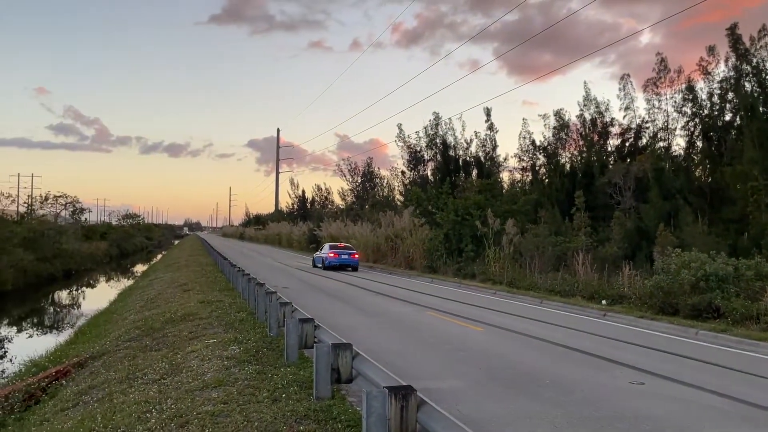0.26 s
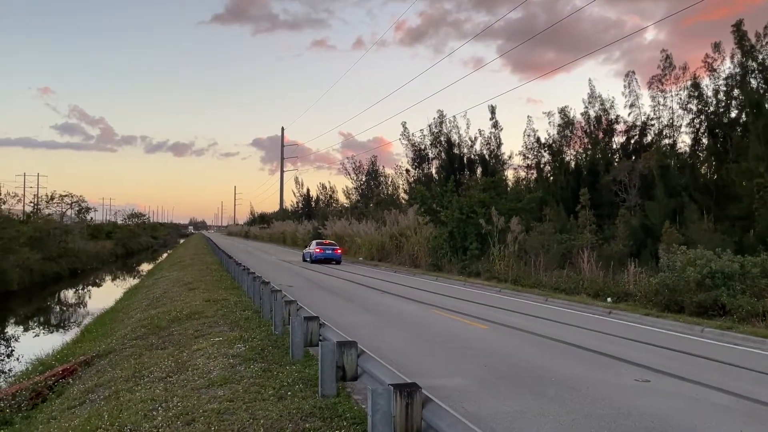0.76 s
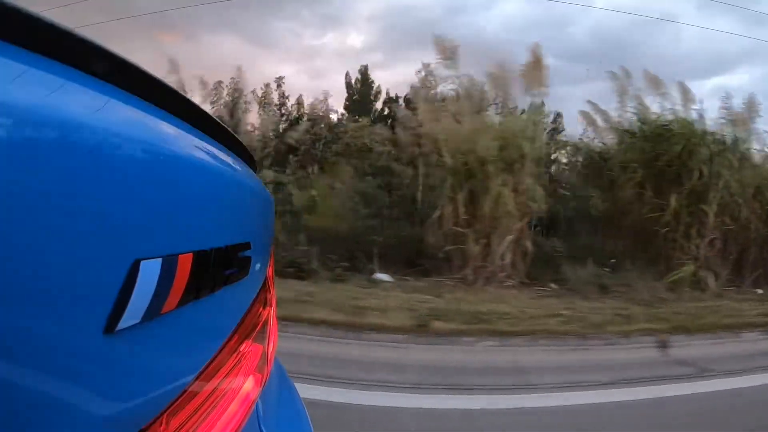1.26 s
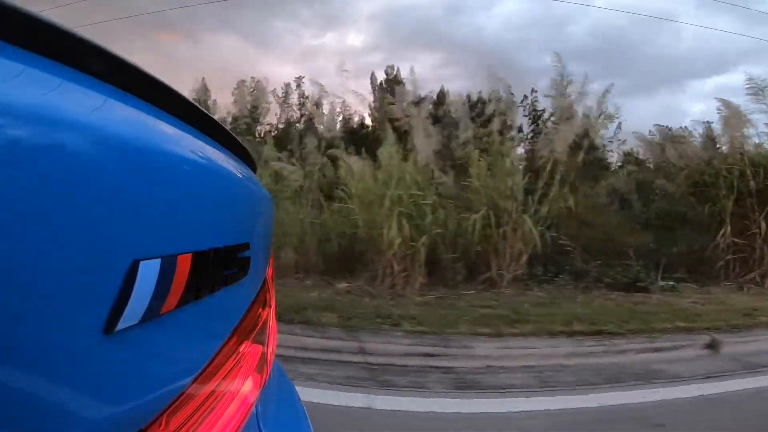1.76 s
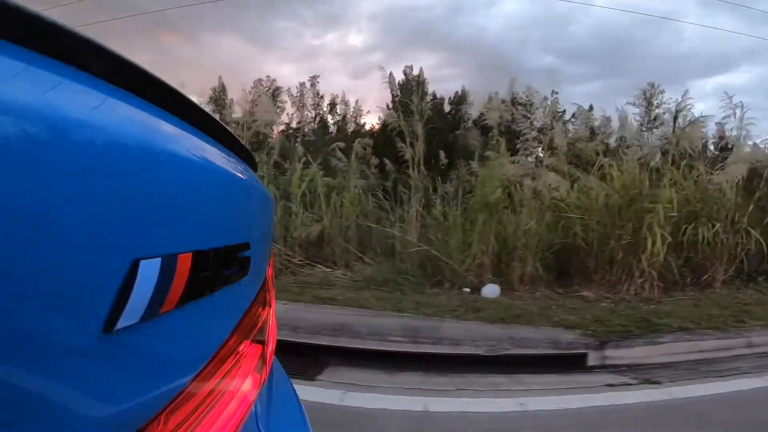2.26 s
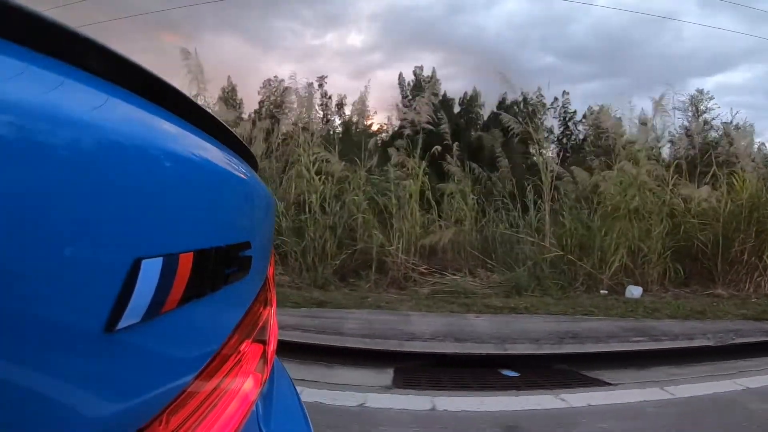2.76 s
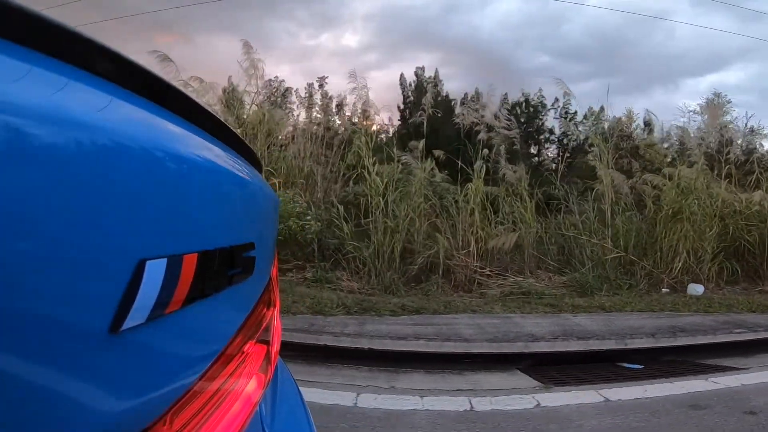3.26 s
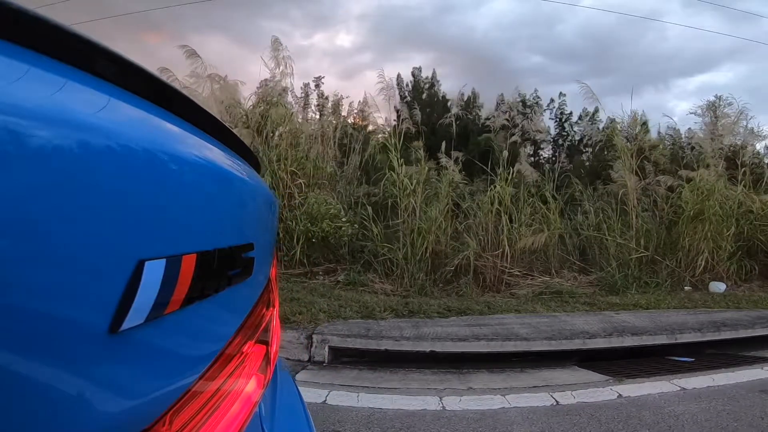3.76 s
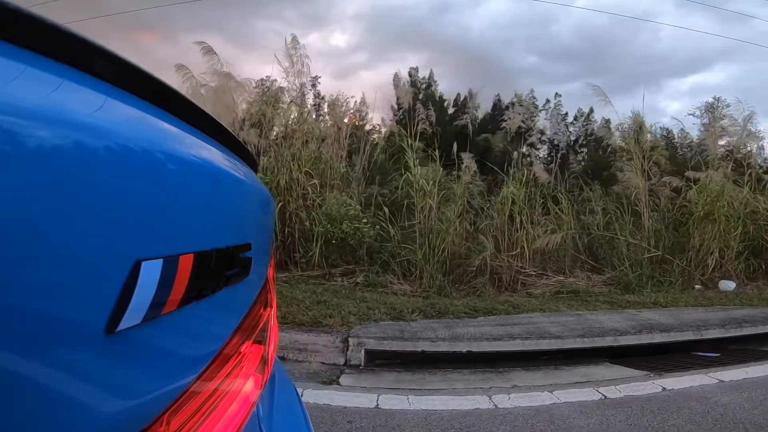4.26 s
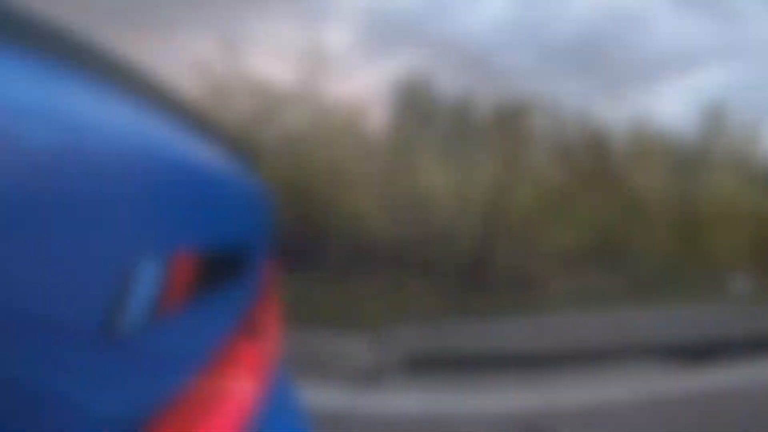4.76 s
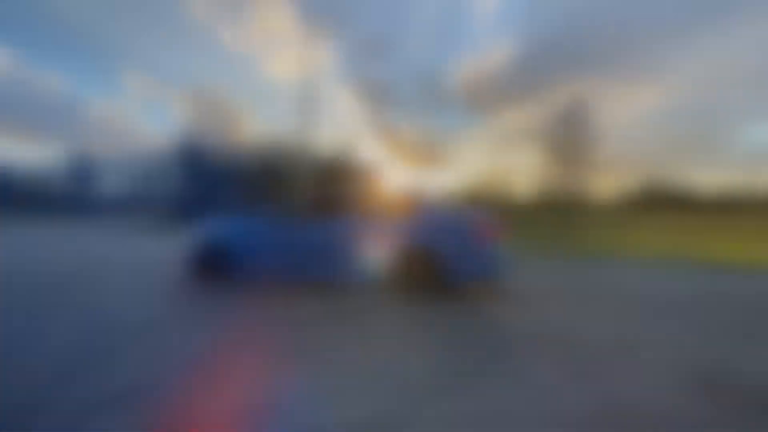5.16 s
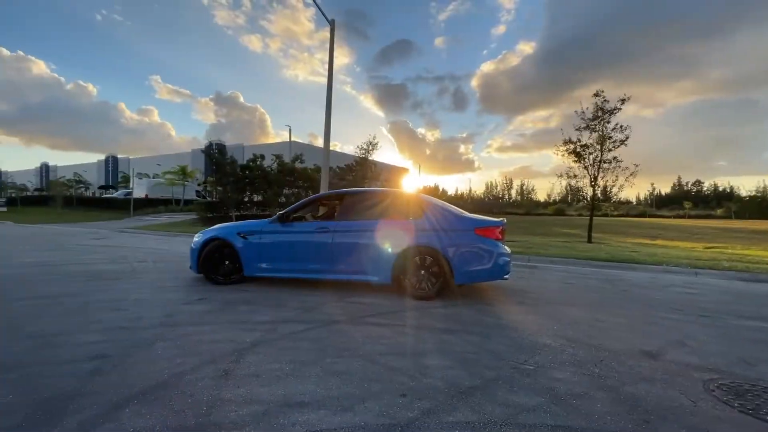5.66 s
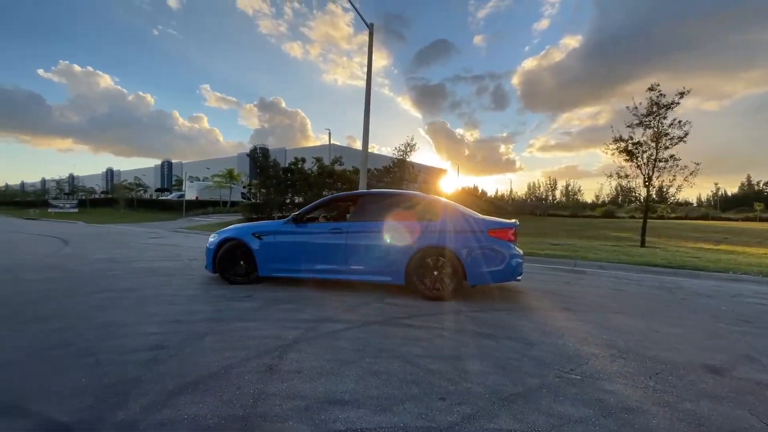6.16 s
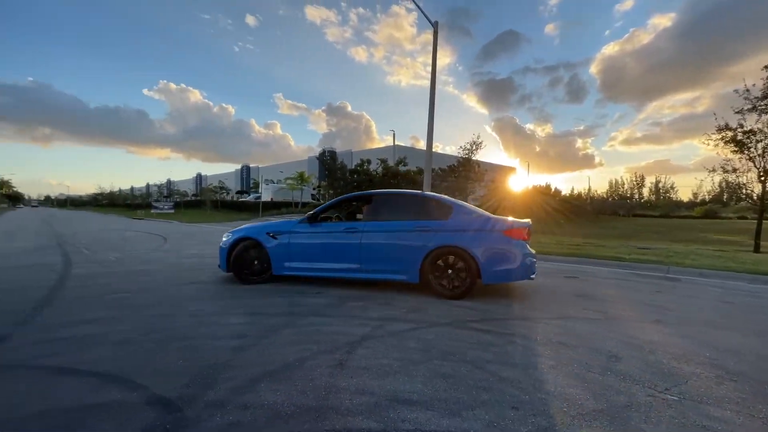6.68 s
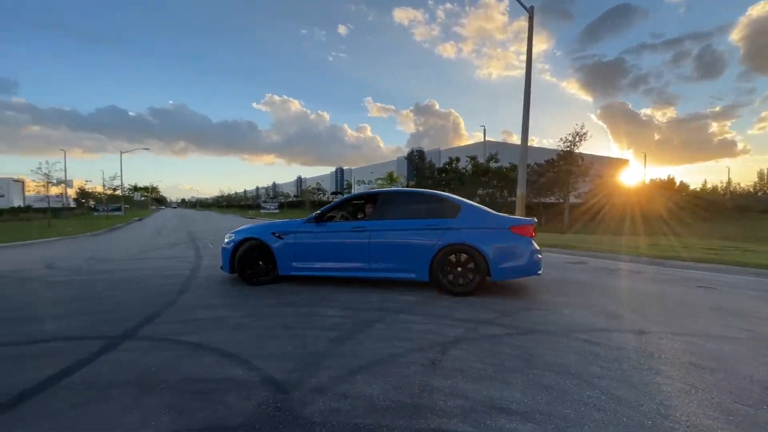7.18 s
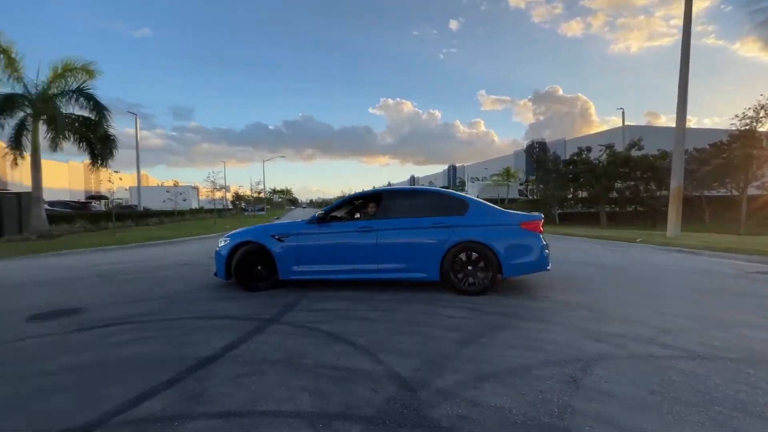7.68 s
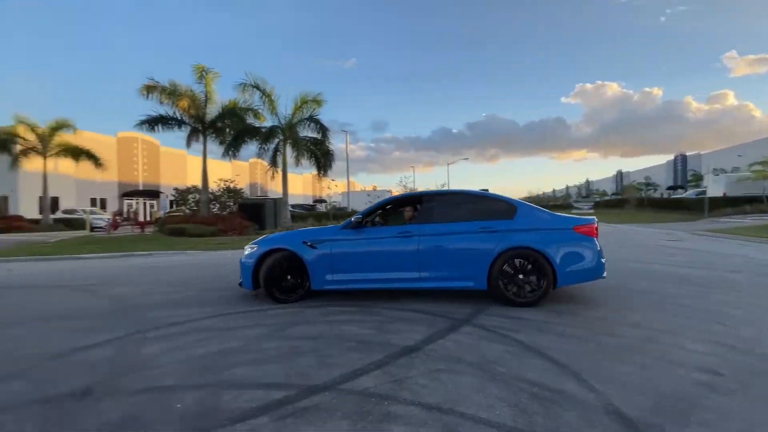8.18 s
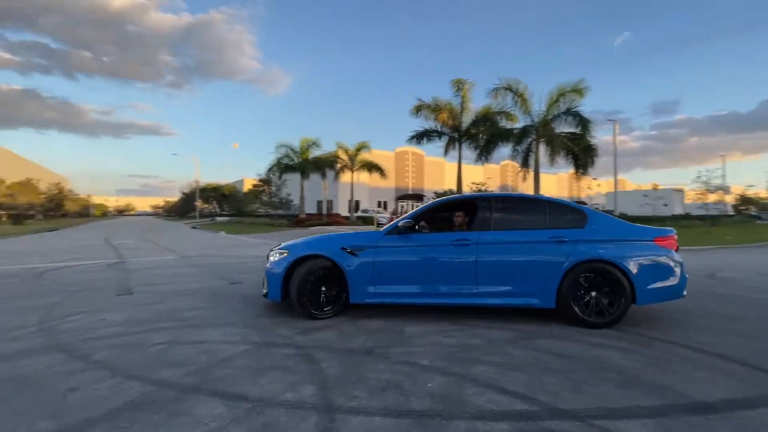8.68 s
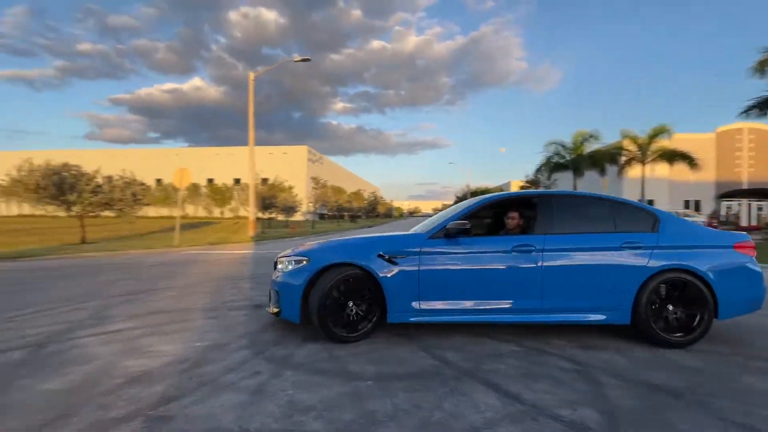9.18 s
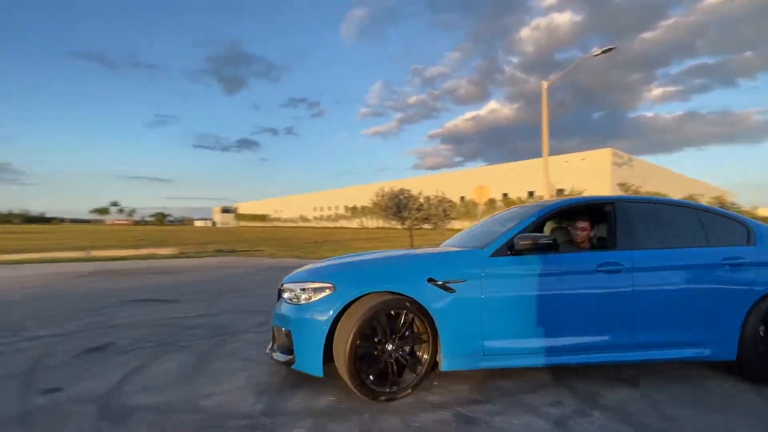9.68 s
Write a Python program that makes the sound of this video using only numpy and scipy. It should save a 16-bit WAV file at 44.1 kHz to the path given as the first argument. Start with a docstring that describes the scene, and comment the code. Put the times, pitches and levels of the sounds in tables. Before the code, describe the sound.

Outdoors, a car's tyre roar and faint drone recede for under a second. Abruptly, a microphone close to the tailpipe hears an eight-cylinder engine rev, crackle with sharp bangs and deep booms, then drop to a lumpy, chuffing idle. This blends into a paved lot, where the car pulls away with a rising growl, then circles with bursts of throttle, scrubbing rubber and ragged tyre squeal coming closer in stereo.

```python
"""An eight-cylinder car coasts away down a road; then, close by, it revs, bangs and burbles down to idle.
On a paved lot it pulls away and circles, the rear tyres scrubbing and squealing.
Uneven firing pulses excite silencer and pipe resonances, and exploding fuel adds booms and cracks.
Tyres are filtered noise and stick-slip tones; small arrival lags between two microphone ports turn the car."""
import sys
import numpy as np
from scipy import signal
from scipy.fft import rfft, irfft, next_fast_len
from scipy.io import wavfile
from scipy.ndimage import uniform_filter1d, map_coordinates

SR = 44100
rng = np.random.default_rng(int(sys.argv[2]) if len(sys.argv) > 2 else 0)


def master_out(mix):
    """Clip the mix to full scale and print it as 16-bit PCM to the path in sys.argv[1]."""
    frames = np.transpose(np.atleast_2d(mix))
    ceiling = np.clip(frames, -1, 1)
    pcm = np.round(ceiling * 32767).astype(np.int16)
    wavfile.write(sys.argv[1], SR, pcm)


N = 437913
TIME = np.arange(N) / SR


def undb(db):
    """Level to amplitude: 20 dB is a factor of ten."""
    return 10 ** (np.asarray(db) / 20)


def curves(table):
    """Linear interpolation in time of each column after the first."""
    s, *columns = np.transpose(table)
    return [np.interp(TIME, s, column) for column in columns]


def noise():
    """White noise: equal power at all frequencies."""
    return rng.standard_normal(N)


def unit(x):
    """Normalization to an rms of 1."""
    return x / np.sqrt(np.mean(x ** 2))


def even(x):
    """Running rms normalization over a fifth of a second, which keeps the quick flutter."""
    return x / np.sqrt(uniform_filter1d(x ** 2, size=SR // 5) + 1e-12)


def walk(rate):
    """Random modulation: noise averaged twice over 1/rate seconds, with rms 1."""
    width = max(int(SR / rate), 2)
    return unit(uniform_filter1d(uniform_filter1d(noise(), width), width))


def colour(x, points):
    """Minimum-phase filtering: the (Hz, dB) curve fixes a causal response, scaled to unit power gain."""
    size = next_fast_len(N + SR // 4)
    size += size % 2
    hz, db = np.transpose(points)
    f = np.arange(size // 2 + 1) * SR / size + 1
    log_gain = np.log(undb(np.interp(np.log(f), np.log(hz), db)))
    outside = np.maximum(np.log(f / hz[-1]), 0) + np.maximum(np.log(hz[0] / f), 0)
    log_gain -= 2 * outside  # skirts keep falling beyond the end points
    cepstrum = irfft(log_gain)
    cepstrum[1:size // 2] *= 2  # folding the cepstrum makes the response causal
    cepstrum[size // 2 + 1:] = 0
    response = np.exp(rfft(cepstrum))
    response = response / np.sqrt(np.mean(abs(response) ** 2))
    return irfft(rfft(x, size) * response, size)[:N]


def low_cut(x, hz, order=2):
    """High-pass filtering: bass below the cutoff is removed."""
    return signal.sosfilt(signal.butter(order, hz, "high", fs=SR, output="sos"), x)


def fade(start, end):
    """Linear envelope: 0 to 1 between two times."""
    return np.clip((TIME - start) / max(end - start, .01), 0, 1)


def ramp(start, length):
    """Linear envelope: 0 to 1 over a length of time."""
    return fade(start, start + length)


def add(track, s, sound):
    """Superposition: a sound is summed in at a time."""
    i = int(s * SR)
    track[i:i + len(sound)] += sound[:N - i]


def hump(t, swell):
    """Transient envelope: it swells to 1 and dies away."""
    return t / swell * np.exp(.5 - .5 * (t / swell) ** 2)


def burst(hz, swell):
    """Transient resonance: a sine that swells and dies away."""
    t = TIME[:SR // 4]
    return hump(t, swell) * np.sin(2 * np.pi * hz * t)


def effort(hz, throttle, idle_db, per_octave_db, throttle_db):
    """Radiated level: it changes with each doubling of the revs and with the throttle."""
    return idle_db + per_octave_db * np.log2(hz / IDLE_HZ) + throttle_db * throttle


# spells of misfiring, when rumble joins the note: start_s [s], length_s [s], rumble_db [dB],
# note_change_db [dB]
MISFIRE_SPELLS = [(1.288, 0.28, -15, 2), (2.31, 0.321, -14, -9.5)]


def spell(s, length):
    """Gating: the envelope of one spell of misfiring, with a quick onset and slower fade."""
    onset_s, fade_s = 0.017, 0.037
    return ramp(s, onset_s) * (1 - ramp(s + length, fade_s))


# engine on the road between stabs of throttle: start_s [s], firing_hz [Hz], note_db [dB before throttle]
ROAD_REVS = [(0, 282.6, -39), (.74, 203.2, -38), (.87, 225.2, -27.5), (1.43, 265.7, -27),
             (1.65, 228, -26.5), (1.9, 199, -19.5), (2.05, 173.5, -24.5), (2.2, 144.3, -16),
             (2.72, 79.7, -16), (2.88, 71, -14), (3.05, 63.4, -12.5), (3.15, 56.4, -18),
             (3.9, 55.56, -16.5), (4.5, 48.3, -23)]
# engine on the lot between stabs: start_s [s], firing_hz [Hz], note_db [dB before throttle]
LOT_REVS = [(5.35, 47.5, -34.5), (5.75, 48.38, -31), (6.16, 67.95, -10.5), (6.35, 78.03, -10.5),
            (6.6, 99.1, -12.5), (7.001, 90.38, -11), (7.4, 106.2, -15), (7.7, 122.1, -25),
            (9.93, 151.9, -32.5)]
# stabs of throttle: start_s [s], opening_s [s], held_until_s [s after start], closing_s [s], glide_s [s],
# from_hz [firings/s], to_hz [firings/s], depth [0-1]
THROTTLE_STABS = [(.88, 0.14, 0.33, 0.056, .08, 230.8, 224.9, 0.34),
                  (1.055, .12, 0.19, 0.094, .23, 210.6, 287.3, 0.58),
                  (7.74, 0.44, 0.593, .06, .52, 126.4, 221.3, 0.3),
                  (8.48, 0.087, 0.25, 0.069, .2, 180.6, 260.3, 0.63),
                  (9.05, 0.057, 0.091, 0.16, .2, 187.2, 179.1, 0.56),
                  (9.67, 0.085, 0.17, 0.065, 0.12, 123.5, 160.7, 0.71)]
LEAD_S, GLIDE_SHARE = 0.04, .57  # throttle leads the revs; share of the glide done halfway
NOTE_THROTTLE_DB = 23.5  # the note's gain at full throttle
IDLE_HZ, LUG_HZ = 51, 56.7  # firing rate at idle; below the second the engine lugs


def engine():
    """Throttle control: each stab makes the note louder as the firing rate glides up or slightly down."""
    rows = ROAD_REVS + LOT_REVS
    revs, throttle = [(s, hz) for s, hz, _ in rows], 0
    for s, opening, held, closing, glide, from_hz, to_hz, depth in THROTTLE_STABS:
        halfway_hz = from_hz + GLIDE_SHARE * (to_hz - from_hz)
        revs += [(s, from_hz), (s + glide / 2, halfway_hz), (s + glide, to_hz)]
        stab = depth * ramp(s - LEAD_S, opening) * (1 - ramp(s + held, closing))
        throttle = np.maximum(throttle, stab)
    burble = sum(spell(s, length) for s, length, _, _ in MISFIRE_SPELLS)
    misfire_db = sum(db * spell(s, length) for s, length, _, db in MISFIRE_SPELLS)
    note_db = curves(rows)[1] + NOTE_THROTTLE_DB * throttle + misfire_db
    return curves(sorted(revs))[0], throttle, burble, note_db


# colour of the direct roar: frequency_hz [Hz], level_db [dB, relative]
DISTANT_TYRE_COLOUR = [(300, -11), (420, -6), (600, 0.5), (1400, -0.5), (2200, -9.5), (2950, -15),
                       (3400, -24.5), (5200, -26.5), (5800, -34), (10000, -43.5), (14000, -38)]
# colour of the roar scattered by the trees: frequency_hz [Hz], level_db [dB, relative]
TREE_SCATTER_COLOUR = [(120, -5), (200, -7), (397, -13), (630, -7), (2020, -11), (5650, -32), (9940, -34),
                       (12000, -42), (15600, -63), (22000, -120)]


def far_tyres():
    """Spreading and scattering: tyre roar fades down the road, its scattered part opposite at the two ports."""
    receding_db = walk(10) / 2 - 6 * TIME
    direct = undb(-37.5) * colour(noise(), DISTANT_TYRE_COLOUR)
    scattered = undb(-44.0) * colour(noise(), TREE_SCATTER_COLOUR) * np.array([[1], [-1]])
    return undb(receding_db) * (direct + scattered)


def distant_drone():
    """Frequency modulation: a wavering low tone and its octave."""
    phase = 2 * np.pi * np.cumsum(160 * (1 + 0.0097 * walk(22))) / SR
    return undb(2 * walk(7.5)) * (undb(-34.0) * np.sin(phase) + undb(-46) * np.sin(2 * phase))


# silencer response against revs: firing_hz [Hz], octave_db [dB against the note]
SILENCER_OCTAVE = [(48, 10), (52, -0.5), (56, -9.5), (64, -54), (80, -35), (100, -11), (120, -6),
                   (129, 9.5), (141, 2.5), (153, -4.5), (170, -9.5), (179, -3.5), (188, -1.5), (198, -26.5),
                   (212, -3), (232, -24.5)]


def octave_level(hz, note_db):
    """Resonant gain: the silencer favours the note's octave at certain revs."""
    return note_db + np.interp(hz, *np.transpose(SILENCER_OCTAVE))


def note(turns, tone_db, octave_db, flutter_db):
    """Harmonic synthesis: the exhaust note flutters, and its third order follows the octave."""
    phase = 2 * np.pi * turns
    upper = np.sin(2 * phase + 1) + undb(-23.5) * np.sin(3 * phase)
    fundamental = undb(tone_db + flutter_db * walk(40)) * np.sin(phase)
    return np.sqrt(2) * (fundamental + undb(octave_db + flutter_db * walk(60)) * upper)


# departure of each of eight firings from the average pulse: size [share]
FIRING_SIZES = [0.51, -0.44, 0.24, -0.41, 0.16, -0.46, -0.38, 0.19]


def firings(turns, scatter, mean):
    """Periodic excitation: one pulse per firing, sized by cylinder order and some chance."""
    at = np.flatnonzero(np.diff(np.floor(turns)))
    pulses = np.zeros(N)
    pulses[at] = mean + np.resize(FIRING_SIZES, len(at)) + scatter * noise()[:len(at)]
    return even(pulses)


def gas(turns, depth):
    """Modulated turbulence: noise puffs with each firing and throbs with each crank turn."""
    throb = np.cos(2 * np.pi * turns) + np.cos(np.pi * turns / 2)
    return unit(noise() * np.exp(depth * throb))


def disperse(x, spread_s):
    """Dispersion: each frequency has its own delay, which spreads a pulse and keeps its colour."""
    size = 2 * next_fast_len(N)
    wander = np.cumsum(rng.standard_normal(size // 2 + 1)) / np.sqrt(SR)
    delay = spread_s * (1 + np.sin(np.pi * wander))
    return irfft(rfft(x, size) * np.exp(-2j * np.pi * np.cumsum(delay) * SR / size), size)[:N]


# colour of the silencer rumble: frequency_hz [Hz], level_db [dB, relative]
RUMBLE_COLOUR = [(15, -25.5), (35, -29), (60, -4.5), (85, -2), (110, -8.5), (150, -19.5), (260, -48.5)]


def exhaust(turns, hz, rumble_db, growl_db, rasp_db, growl_colour, rasp_colour, gas_db, puff, uneven, firm):
    """Half-order excitation: unequal firings drive silencer rumble, pipe growl and tailpipe rasp."""
    force = (hz / 220) ** 2  # pulses gain on the gas noise as the revs rise
    rumble = colour(firings(turns, scatter=uneven, mean=0), RUMBLE_COLOUR)
    growl_source = force * firings(turns, scatter=uneven, mean=0) + undb(-8) * gas(turns, depth=.6)
    growl = colour(growl_source, growl_colour)
    sharp = force * disperse(firings(turns, scatter=.15, mean=firm), spread_s=.012)
    rasp = colour(sharp + undb(gas_db) * gas(turns, puff * np.minimum(force, 1)), rasp_colour)
    return undb(rumble_db - 4.5) * even(rumble) + undb(growl_db) * even(growl) + undb(rasp_db) * even(rasp)


# colour of the rolling tyres: frequency_hz [Hz], level_db [dB, relative]
ROLLING_COLOUR = [(330, 2.5), (450, -4), (650, -4.5), (820, -9), (950, -11.5), (1300, -10.5), (3000, -18),
                  (9000, -52.5)]


def rolling_hiss():
    """Broadband contact noise: filtered noise with a random flutter."""
    return undb(-57.5 + 4.1 * fade(3.24, 3.51) + walk(18)) * colour(noise(), ROLLING_COLOUR)


def buffeting(rumble_db):
    """Low-frequency turbulence: air buffets in step with the level of the rumble."""
    return undb(rumble_db - 14.0) * colour(noise(), [(18, 0.5), (35, 0.0), (60, -7.5)])


# colour of the chuffing: frequency_hz [Hz], level_db [dB, relative]
CHUFF_COLOUR = [(220, -10.5), (370, 4.5), (490, 1), (700, -9), (1000, -16), (1450, -17), (2200, -26)]


def chuffing(turns, lug):
    """Pulsed flow noise: single firings stand out as the engine lugs."""
    return undb(-63 + 12.7 * lug) * colour(gas(turns, depth=0.23), CHUFF_COLOUR)


# puffs of gas from the tailpipe: start_s [s], swell_s [s], level_db [dB]
GAS_PUFFS = [(1.064, 0.016, -50.5), (1.28, 0.1, -57.5), (1.408, 0.01, -60), (1.758, 0.01, -59),
             (2.108, 0.011, -65), (2.324, 0.024, -60.5), (2.95, 0.048, -69.5)]
# colour of a puff: frequency_hz [Hz], level_db [dB, relative]
PUFF_COLOUR = [(1500, -3.5), (3200, 7.5), (5100, -2), (6000, -14.5), (8200, -11), (12000, -25)]


def puffs():
    """Jet noise: short swells of filtered noise hiss from the tailpipe."""
    envelope = np.zeros(N)
    for s, swell, db in GAS_PUFFS:
        add(envelope, s, undb(db) * hump(TIME[:SR], swell))
    return envelope * colour(noise(), PUFF_COLOUR)


def overrun(waver=0.0975, flutter_db=2.0):
    """Sustained resonance: misfires keep the silencer swinging at an unsteady pitch and strength."""
    silencer_hz = 69
    phase = 2 * np.pi * np.cumsum(silencer_hz * (1 + waver * walk(35))) / SR
    size = sum(undb(db) * spell(s, length) for s, length, db, _ in MISFIRE_SPELLS)
    return np.sqrt(2) * size * undb(flutter_db * walk(45)) * np.sin(phase)


def tailpipe(x):
    """Standing waves: a blast runs up and down the pipe and rings at multiples of its round trip."""
    trips_hz, returned_share = 270.8, 0.26  # round trips a second; share that the mouth sends back
    size = 2 * next_fast_len(N)
    trip = np.exp(-2j * np.pi * np.arange(size // 2 + 1) * SR / size / trips_hz)
    return irfft(rfft(x, size) / (1 - returned_share * trip), size)[:N]


# bright jets with the hottest pops: start_s [s], level_db [dB]
HOT_JETS = [(1.491, -39), (1.55, -41), (1.568, -39), (1.661, -42), (1.675, -41), (1.758, -43)]
# colour of the jets: frequency_hz [Hz], level_db [dB, relative]
JET_COLOUR = [(1800, -4), (2650, 4), (3900, -26.5)]


def barks(swell=0.0042):
    """Jet noise: the hottest pops spit bright gas from the pipe's mouth."""
    envelope = np.zeros(N)
    for s, db in HOT_JETS:
        add(envelope, s, undb(db) * hump(TIME[:SR // 4], swell))
    return envelope * colour(noise(), JET_COLOUR)


# silencer booms as unburnt fuel lights: start_s [s], level_db [dB], swell_s [s]
SILENCER_BOOMS = [(1.532, -16, 0.017), (1.632, -4.5, 0.0079), (1.66, -8, 0.013), (1.765, -5, 0.0088),
                  (1.891, -4.5, 0.0081), (1.929, -12, 0.012), (2.005, -4, 0.0032), (2.021, -9, 0.017),
                  (8.372, -8, 0.024), (8.795, -5, .022), (8.953, -11, .02), (9.024, -7.5, .014),
                  (9.289, -13, 0.022), (9.559, -10, 0.014)]
# sharp cracks of afterfire, mostly in clumps: start_s [s], level_db [dB, before pipe and colour]
AFTERFIRE_CRACKS = [(1.397, -17), (1.438, -20), (1.492, -8), (1.517, -21.5), (1.531, -12), (1.543, -17.5),
                    (1.5692, -12.5), (1.6305, -13), (1.635, -8), (1.662, -13), (1.674, -16.5),
                    (1.764, -9.5), (1.768, -15.5), (1.779, -16.5), (1.892, -16.5), (1.899, -14),
                    (1.912, -21.5), (2.003, -19), (2.027, -23), (2.039, -20), (2.33, -30), (2.41, -34.5),
                    (2.512, -34.5), (8.795, -25.5), (9.558, -15)]
# colour of the cracks: frequency_hz [Hz], level_db [dB, relative]
CRACK_COLOUR = [(120, -20.5), (210, 13.5), (320, 1), (400, 9.5), (550, 6), (690, -0.5), (860, 4.5),
                (1150, -8.5), (1450, -10.5), (2050, -19), (2480, -24), (3200, -36.5), (4000, -46.5),
                (7000, -64.5), (14000, -66.5)]
# pitch and swell of a typical boom; slower booms are deeper by the last power
BOOM_HZ, BOOM_SWELL_S, BOOM_SAG = 83.7, 0.011, 0.1


def afterfire(t60=0.12, throb=0.78):
    """Impulsive excitation: fuel lights in the pipe, making shock fronts, throbbing gas and silencer booms."""
    booms, cracks, t = np.zeros(N), np.zeros(N), TIME[:SR // 4]
    for s, boom_db, swell in SILENCER_BOOMS:
        pitch_hz = BOOM_HZ * (BOOM_SWELL_S / swell) ** BOOM_SAG
        add(booms, s, undb(boom_db) * burst(pitch_hz, swell))
    for s, crack_db in AFTERFIRE_CRACKS:
        swing = throb * np.cos(4 * np.pi * BOOM_HZ * t)  # gas tears out twice a pressure cycle
        blast = rng.standard_normal(len(t)) * np.exp(-np.log(1000) * t / t60 - swing - 1)
        blast[0] = undb(16)  # shock front
        add(cracks, s, undb(crack_db) * blast)
    return low_cut(booms, hz=30) + colour(tailpipe(cracks), CRACK_COLOUR) + barks()


def whine():
    """Frequency modulation: a faint tone with wandering pitch and level."""
    phase = 2 * np.pi * np.cumsum(424 + 3 * walk(14)) / SR
    return fade(2.6, 2.8) * undb(-54.5 + 2 * walk(10.0)) * np.sin(phase)


# colour of the pipe growl on the road: frequency_hz [Hz], level_db [dB, relative]
ROAD_GROWL_COLOUR = [(90, -48.5), (145, -7), (205, 7), (265, -0.5), (325, -7), (385, -9.5), (480, -12.5),
                     (750, -36.5)]
# colour of the tailpipe rasp on the road: frequency_hz [Hz], level_db [dB, relative]
ROAD_RASP_COLOUR = [(250, -25), (400, -2.5), (540, 1), (680, -2.5), (815, 8.5), (900, 0.5), (1010, -5.5),
                    (1200, -7.5), (1340, -3.5), (1650, -8), (2000, -15.5), (2800, -24.5), (3600, -33),
                    (8000, -48.5), (14000, -62.5)]


def road(turns, hz, throttle, burble, note_db):
    """Source superposition: distant roar and drone give way to the close exhaust, rolling hiss and air."""
    close, distant = fade(.85, .89), 1 - fade(.84, .95)
    lug = np.clip((LUG_HZ - hz) / max(LUG_HZ - IDLE_HZ, 1), 0, 1)
    rumble_db = effort(hz, throttle, idle_db=-26.5, per_octave_db=5.5, throttle_db=0.5)
    rumble_db += 3.0 * burble + 7 * lug - 17 * distant
    growl_db = effort(hz, throttle, idle_db=-53.5, per_octave_db=10.5, throttle_db=18.0)
    growl_db += 6 * burble + 8 * lug - 9 * distant
    rasp_db = effort(hz, throttle, idle_db=-70.5, per_octave_db=13.5, throttle_db=32)
    rasp_db += 4.6 * burble + 10 * lug + 20 * np.log10(.01 + close)
    octave_db = octave_level(hz, note_db) - 30 * np.clip(hz / 60 - 1, 0, 1)
    tone = note(turns, note_db, octave_db, flutter_db=1.1)
    pipes = tone + overrun() + exhaust(
        turns, hz, rumble_db, growl_db, rasp_db, ROAD_GROWL_COLOUR, ROAD_RASP_COLOUR,
        gas_db=-6.5, puff=0.58, uneven=.34, firm=.45)
    far = far_tyres() + distant_drone()
    near = rolling_hiss() + whine() + buffeting(rumble_db) + chuffing(turns, lug) + puffs()
    return pipes + np.sqrt(1 - close) * far + close * near


def load(hz, lag_s=0.043):
    """First-order lag: engine pull, -1 to 1, follows the change of the revs in octaves a second."""
    change = np.clip(np.gradient(np.log2(hz)) * SR, -1, 1)
    keep = np.exp(-1 / (lag_s * SR))
    return signal.lfilter([1 - keep], [1, -keep], change)


# tailpipe resonances: frequency_hz [Hz], level_db [dB, relative]
PIPE_SONG_COLOUR = [(170, -33), (270, -5), (335, -7), (415, -10), (540, -7), (630, -0.5), (730, -1),
                    (800, -4.5), (1000, -2.5), (1200, -15.5)]


def pipe_song(turns, hz, throttle, nose_on):
    """Resonant orders: the tailpipe sings on gliding firing orders that cross its resonances."""
    pulses = firings(turns, scatter=.2, mean=.45)
    song_db = effort(hz, throttle, idle_db=-52.5, per_octave_db=13, throttle_db=5) - 1.5 * nose_on
    return undb(song_db) * even(colour(disperse(pulses, spread_s=0.01195), PIPE_SONG_COLOUR))


def pipe_ring(turns, ring_db, ring_hz=631, width_hz=15):
    """Narrow resonance: gas noise keeps one tailpipe mode ringing at a fixed pitch."""
    flow = colour(gas(turns, depth=.5), [(480, -12), (630, 0), (820, -12)])
    peak = signal.iirpeak(ring_hz, ring_hz / width_hz, fs=SR)
    return undb(ring_db) * even(signal.lfilter(*peak, flow))


# spells when the spinning rear tyres tear hardest at the paving: start_s [s], length_s [s], extra_db [dB]
TYRE_SCUFFS = [(7.726, 0.53, 6.5), (8.48, 0.19, 6), (9.01, 0.23, 4), (9.408, 0.094, 3)]


def scuffs():
    """Friction level: extra scrub in dB while the tyres tear at the paving."""
    edge_s = 0.12
    return sum(db * ramp(s, edge_s) * (1 - ramp(s + length, edge_s)) for s, length, db in TYRE_SCUFFS)


# colour of the scrubbing rubber: frequency_hz [Hz], level_db [dB, relative]
SCRUB_COLOUR = [(900, -3.5), (1400, 1), (1650, 3.5), (1950, -1.5), (2450, 2.5), (3000, -7.5), (3700, -17.5),
                (5000, -13.5)]
# colour of the hiss and grit: frequency_hz [Hz], level_db [dB, relative]
HISS_COLOUR = [(2200, -35), (3700, 0.5), (4500, -1.5), (5100, 1.5), (5650, -18), (6100, -5), (6900, -4.5),
               (7600, -17.5), (8500, -7.5), (10500, -12), (13500, -9.5), (15500, -43.5)]


def scrub_and_hiss(turns, scrub_db, hiss_db):
    """Friction noise: three independent fields of rubber scrub and hiss throb with the engine."""
    scrub, hiss = undb(scrub_db + 2 * walk(63)), undb(hiss_db + 1.2 * walk(51))
    fields = []
    for _ in range(3):
        rubber = scrub * colour(gas(turns, depth=0.13), SCRUB_COLOUR)
        fields.append(rubber + hiss * colour(gas(turns, depth=0.072), HISS_COLOUR))
    return fields


# stones snapping under the tyres: start_s [s], level_db [dB, before colour and placing]
GRIT_SNAPS = [(5.030, -43.5), (5.534, -50), (5.871, -37), (6.140, -46), (7.583, -52), (7.86, -43),
              (8.93, -28.5), (9.37, -27)]


def grit(t60=0.021):
    """Impact noise: small stones snap under the tread in short decaying bursts."""
    out, t = np.zeros(N), TIME[:SR // 10]
    for s, db in GRIT_SNAPS:
        add(out, s, undb(db) * rng.standard_normal(len(t)) * np.exp(-np.log(1000) * t / t60))
    return colour(out, HISS_COLOUR)


def stick_slip(table, ragged, flutter_db=2):
    """Stick-slip oscillation: tread blocks grip and slide at a ragged pitch."""
    hz, db = curves(table)
    phase = 2 * np.pi * np.cumsum(hz * (1 + ragged * walk(220) + .03 * walk(25))) / SR
    return undb(db + flutter_db * walk(88)) * np.sin(phase)


# squeal of the sliding rear tyres: start_s [s], pitch_hz [Hz], level_db [dB, before placing]
REAR_SQUEAL = [(7.7, 1160, -35), (8.15, 1182, -20.5), (8.4, 1066, -26.5), (8.6, 1046, -24),
               (9.15, 1100, -24.5), (9.75, 1098, -17), (9.93, 1061, -25)]
# chirps where the rubber grips: start_s [s], pitch_hz [Hz], level_db [dB, before placing], swell_s [s]
GRIP_CHIRPS = [(9.112, 1120, -10, 0.0048), (9.131, 1095, -11, 0.0063), (9.843, 1000, -4.5, 0.0041)]


def squeal():
    """Stick-slip oscillation: the rear tyres slide, now and then biting into a chirp."""
    out = stick_slip(REAR_SQUEAL, ragged=0.0603) * fade(7.63, 7.64)
    for s, pitch, chirp_db, swell in GRIP_CHIRPS:
        add(out, s, undb(chirp_db) * burst(pitch, swell))
    return out


# higher squeal of a second tyre coming close: start_s [s], pitch_hz [Hz],
# level_db [dB, before fade and placing]
SECOND_TYRE_SQUEAL = [(9.0, 1507, -54), (9.55, 1540, -39), (9.76, 1556, -21.5), (9.87, 1524, -18.5),
                      (9.93, 1550, -16.5)]


def near_squeal():
    """Stick-slip oscillation: a second tyre fades in at a higher, more ragged pitch."""
    return stick_slip(SECOND_TYRE_SQUEAL, ragged=0.105) * fade(9.3, 9.9)


# bearing of the circling car: start_s [s], left_lag_ms [ms]
CAR_BEARING = [(5, -0.15), (6, -0.16), (7.3, -0.11), (7.8, 0.18), (8.25, 0.18), (8.75, 0.3), (9.9, 0.34)]


def ports(x, left_db, bearing_share=1):
    """Time difference of arrival: direct sound reaches two ports at slightly different times."""
    lag = bearing_share * curves(CAR_BEARING)[0] * SR / 1000  # in samples
    sides = []
    for side in (1, -1):  # left, right
        delayed = map_coordinates(x, [np.arange(N) - side * lag / 2], order=3)
        sides.append(undb(side * left_db / 2) * delayed)
    return np.array(sides)


def smear(x, t60):
    """Reverberant decay: dense echoes die away exponentially."""
    t = TIME[:SR // 2]
    tail = rng.standard_normal(len(t)) * np.exp(-np.log(1000) * t / t60)
    return signal.fftconvolve(x, tail / np.linalg.norm(tail))[:N]


def reflections(x, t60=0.14):
    """Diffuse scattering: paving and buildings return all but the bass by changing paths to each side."""
    treble, sides = low_cut(x, 290), []
    for _ in range(2):
        shares = np.array([walk(7) for _ in range(3)])
        shares = shares / np.linalg.norm(shares, axis=0)
        sides.append(sum(share * smear(treble, t60) for share in shares))
    return np.array(sides)


# colour of the pipe growl in the open: frequency_hz [Hz], level_db [dB, relative]
LOT_GROWL_COLOUR = [(90, -41.5), (150, -4), (205, 5.5), (270, 2), (325, -1), (385, -3), (480, -16.5),
                    (750, -19.5)]
# colour of the tailpipe rasp on the lot: frequency_hz [Hz], level_db [dB, relative]
LOT_RASP_COLOUR = [(300, -10.5), (470, -3), (600, -2.5), (700, -5), (800, -1), (920, -3.5), (1180, -3),
                   (1380, -14), (2400, -14.5), (5000, -44.5)]


def lot(turns, hz, throttle, note_db):
    """Source directivity: the exhaust turns away while the scrubbing, squealing tyres come closer."""
    slide = ramp(7.745, .08)  # the rear tyres break loose
    nose_on = fade(8.24, 9.52)  # the tail turns away
    pull = load(hz)
    scuff_db = scuffs()
    rumble_db = effort(hz, throttle, idle_db=-25.0, per_octave_db=2.0, throttle_db=3)
    rumble_db += 9 * fade(7.44, 7.88) - 10 * nose_on
    growl_db = effort(hz, throttle, idle_db=-43, per_octave_db=9.0, throttle_db=0.0)
    growl_db += 3.3 * slide - 5 * nose_on + 2 * pull
    rasp_db = effort(hz, throttle, idle_db=-43.5, per_octave_db=6, throttle_db=0)
    rasp_db += 8.7 * slide - 2 * nose_on + 0.5 * pull
    scrub_db = effort(hz, throttle, idle_db=-51.0, per_octave_db=3.5, throttle_db=2.5)
    scrub_db += 6.0 * slide + 13.6 * nose_on + scuff_db
    hiss_db = effort(hz, throttle, idle_db=-54.5, per_octave_db=6.0, throttle_db=-1.5)
    hiss_db += 3.74 * slide + scuff_db
    ring_db = effort(hz, throttle, idle_db=-53.0, per_octave_db=9.0, throttle_db=4.5)
    ring_db += 9 * slide - 10 * nose_on
    octave_db = octave_level(hz, note_db) - 9.8 * nose_on
    tone = note(turns, note_db, octave_db, flutter_db=0.28 + 0.86 * slide)
    firing_sound = exhaust(
        turns, hz, rumble_db, growl_db, rasp_db, LOT_GROWL_COLOUR, LOT_RASP_COLOUR,
        gas_db=-5, puff=0.29, uneven=.27, firm=.35)
    pipes = tone + low_cut(firing_sound, hz=64.0, order=4)
    pipes = pipes + pipe_song(turns, hz, throttle, nose_on) + pipe_ring(turns, ring_db)
    rear_tyres = squeal()
    direct, *around = scrub_and_hiss(turns, scrub_db, hiss_db)
    car = ports(pipes, left_db=-0.9) + ports(rear_tyres, left_db=4.0)
    car += ports(near_squeal(), left_db=1, bearing_share=0.51)
    car += undb(-3.5) * reflections(pipes + rear_tyres)
    paving = ports(undb(-6.5) * direct + grit(), left_db=9.0) + undb(-4.5) * np.array(around)
    return car + paving


def scene():
    """Crossfading: the road dissolves into the lot while the engine idles."""
    hz, throttle, burble, note_db = engine()
    turns = np.cumsum(hz * (1 + 0.004817 * walk(29.73))) / SR  # counts firings
    on_lot = fade(4.714, 5.38)
    on_road = (1 - on_lot) * road(turns, hz, throttle, burble, note_db)
    return on_road + on_lot * lot(turns, hz, throttle, note_db) + afterfire()


def record(dry):
    """Soft saturation and band limiting: the highest peaks are rounded and the top is cut."""
    top_hz = 15400
    rounded = dry / (1 + dry ** 6) ** (1 / 6)
    return signal.sosfilt(signal.ellip(8, .2, 70, top_hz, fs=SR, output="sos"), rounded)


dry = scene()
out = record(dry)
master_out(out)
```